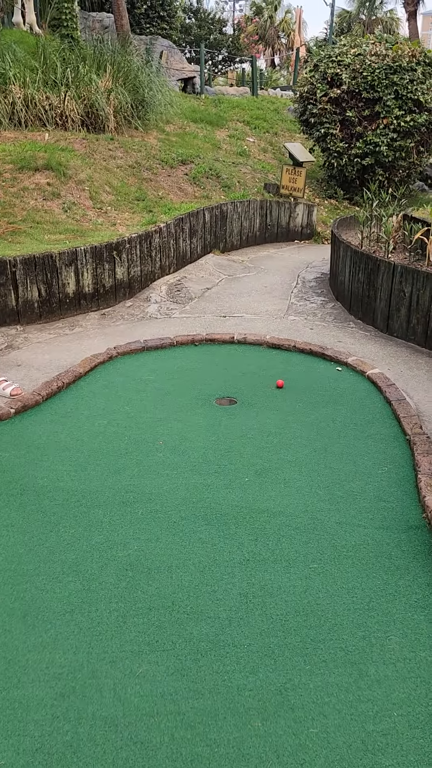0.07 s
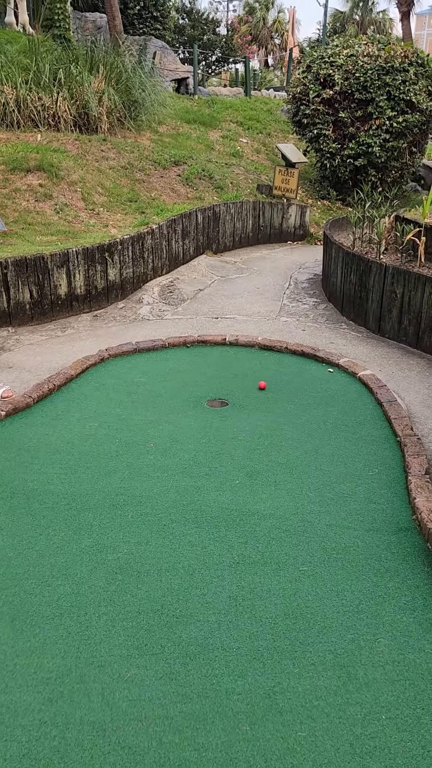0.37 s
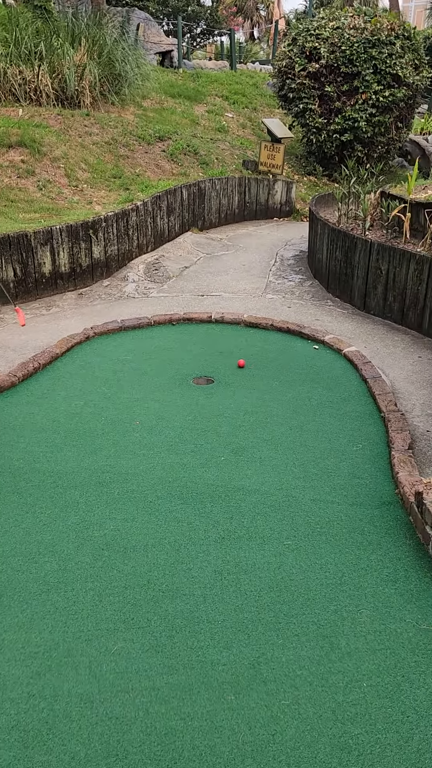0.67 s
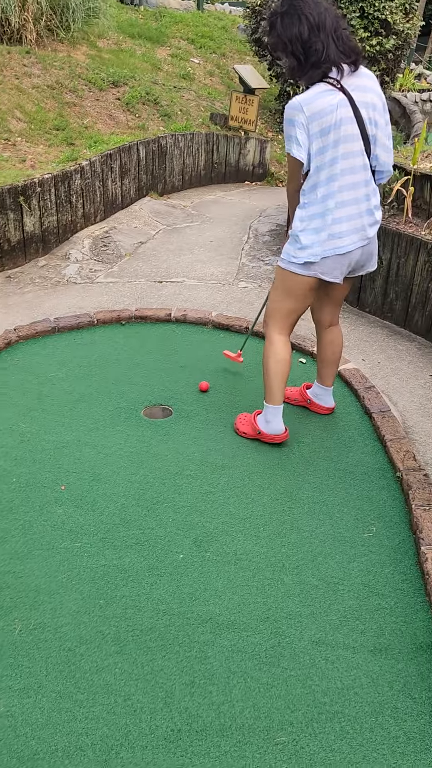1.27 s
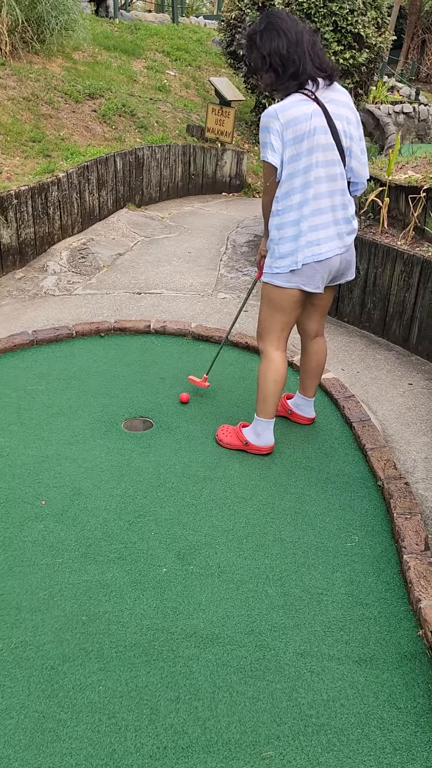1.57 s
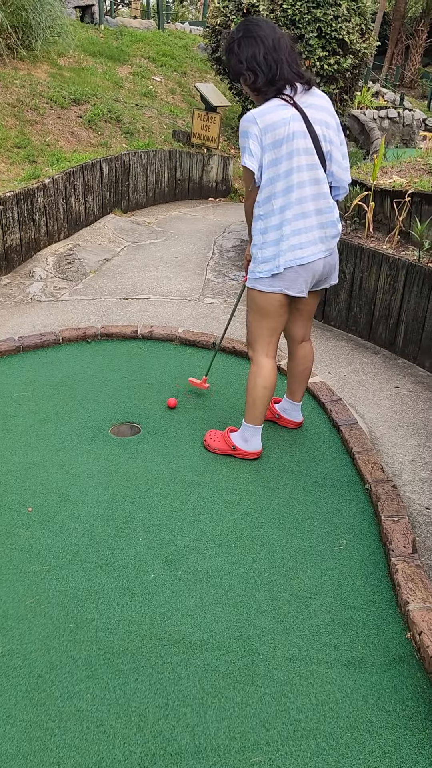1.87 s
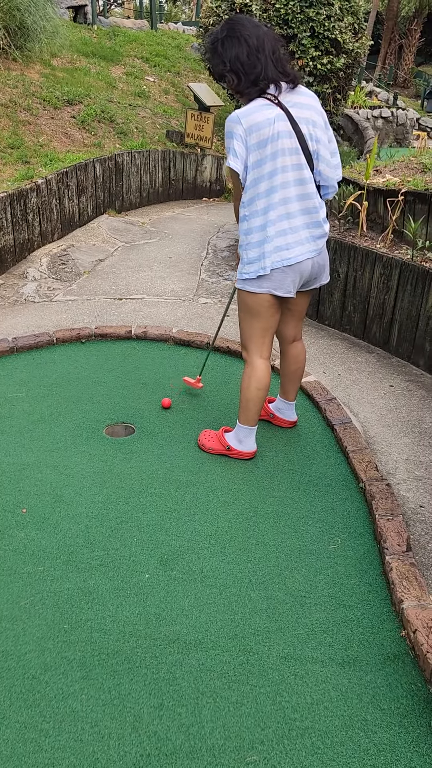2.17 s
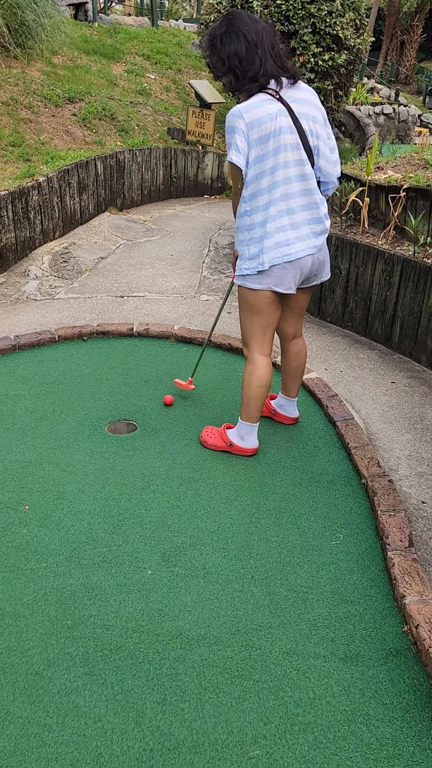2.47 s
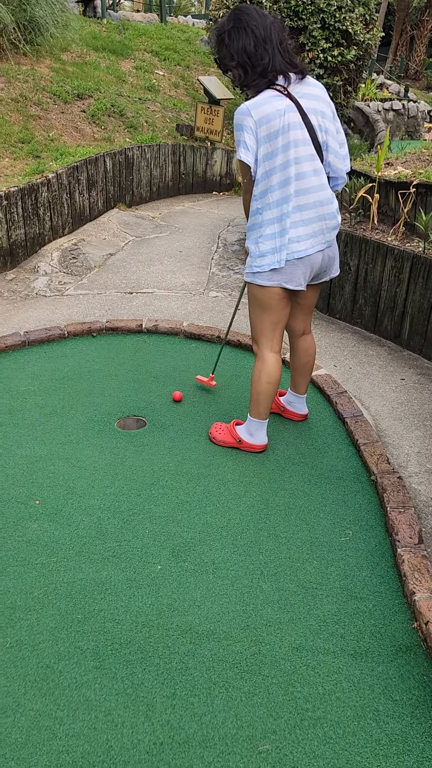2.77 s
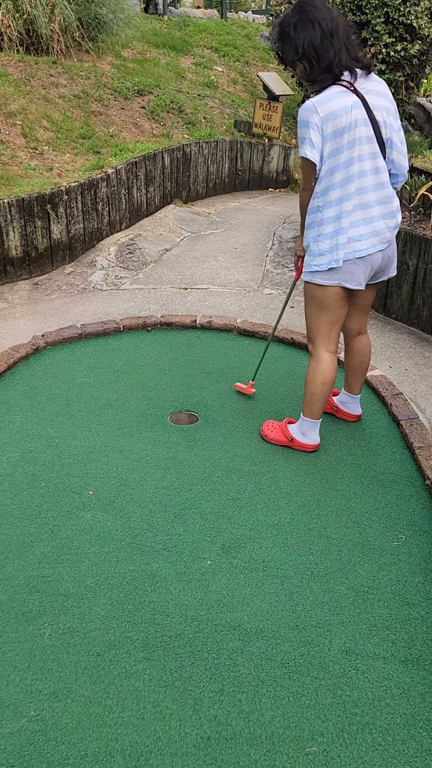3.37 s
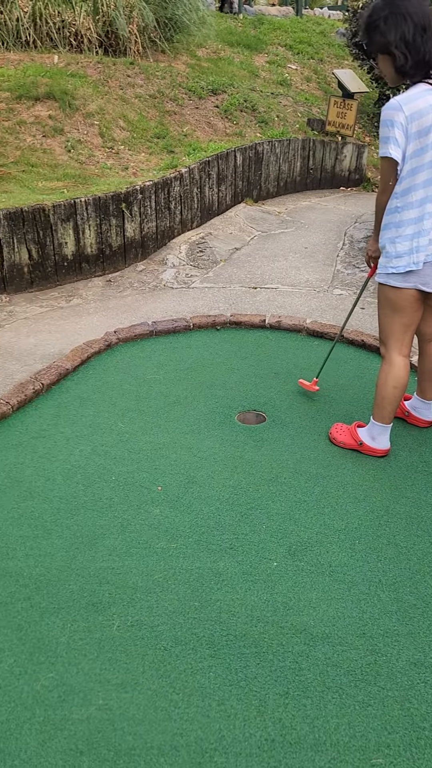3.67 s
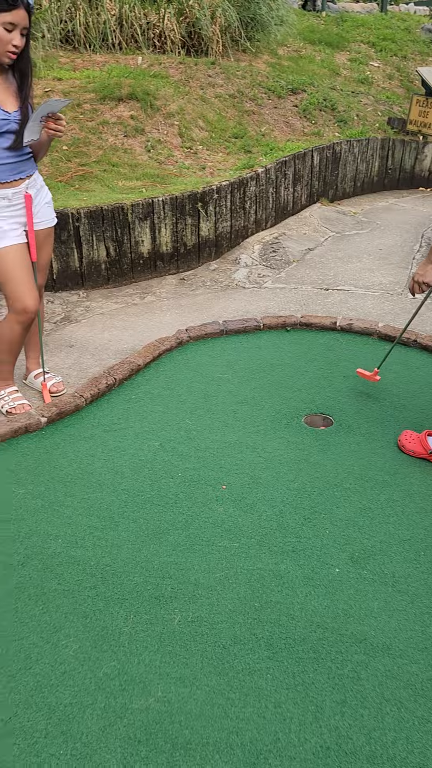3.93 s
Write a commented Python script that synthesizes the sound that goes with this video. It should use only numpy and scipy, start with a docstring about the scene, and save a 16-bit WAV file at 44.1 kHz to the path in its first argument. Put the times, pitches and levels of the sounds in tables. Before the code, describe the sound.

A golf ball drops into a metal cup, knocking and rattling over steady outdoor noise.

```python
"""A golf ball drops into the metal cup of a miniature golf hole and bounces on its bottom.
Each landing gives a hollow knock and a crack. In between, the ball touches the loose metal liner,
which clatters and rings until it settles back. A faint echo follows these sounds.
Behind them is a steady outdoor rush, and wind rumbles on the microphone."""
import sys
import numpy as np
from scipy import signal
from scipy.fft import rfft, irfft
from scipy.io import wavfile
from scipy.ndimage import uniform_filter1d

SR = 44100
rng = np.random.default_rng(int(sys.argv[2]) if len(sys.argv) > 2 else 0)


def transcribe(u):
    """Save the signal u as a 16-bit wav file named by the first command-line argument.

    u: samples, shape (n,) or (channels, n), limited to [-1, 1]; the rate is SR.
    q: integer samples, one column per channel.
    """
    v = np.clip(np.atleast_2d(u).T, -1, 1)
    q = np.round(v * 32767).astype(np.int16)
    wavfile.write(sys.argv[1], SR, q)


N = 176400

# the ball touches the wall: t/s, ring level/dB, clatter level/dB, pitch it rings most/Hz, rise/s
TOUCHES = [(3.3798, -11, -12, 7500, 0.00035), (3.3996, -21, -13.5, 6500, 0.0018),
           (3.403, -10.5, -18.5, 8750, 0.00244), (3.4062, -37, -21.5, 8000, 0.0012),
           (3.4225, -21, -29, 7050, .001), (3.4347, -24.5, -21.5, 8500, 0.00062),
           (3.444, -39, -28.5, 7000, .001), (3.5015, -22.5, -38, 4100, 0.00069),
           (3.513, -27, -23.5, 8000, 0.0045), (3.5204, -22.5, -16.5, 5200, 0.0025),
           (3.5333, -20, -18.5, 4900, 0.00075), (3.5358, -26, -22, 12500, 0.00078),
           (3.545, -19, -21, 4140, 0.0058), (3.5620, -49, -41, 5000, 0.0024),
           (3.57, -32.5, -27, 4940, .002), (3.5815, -40, -21, 7000, 0.0024),
           (3.595, -48, -36, 7000, 0.0012), (3.7430, -27.5, -27, 6400, 0.0009),
           (3.7494, -24.5, -42, 4500, 0.0008), (3.7541, -37, -26, 5000, 0.00056),
           (3.7605, -21.5, -39, 13000, 0.0017)]
# where cracks and clatter sit between the ears: f/Hz, left minus right/dB
CUP_BALANCE = [(500, -5), (2000, -3), (4800, -3.5), (6500, 2), (10300, 2), (11500, -20), (13000, -8),
               (14500, -9)]


def knocks():
    """Each landing is a sharp push and a crack on the bottom; it rings the hollow of the cup."""
    # the ball lands: t/s, knock level/dB, crack level/dB
    landings = [(3.3791, -10, -10.5), (3.5006, -19, -27), (3.5790, -32, -57), (3.7320, -25.5, -50)]
    # tones of the cup's air and bottom: f/Hz, level/dB, time to fade by 60 dB/s
    cup_tones = [(526, -14.5, 0.18), (715, 0, 0.027), (784, -7, 0.058), (840, -7.5, 0.033),
                 (1035, -12.5, 0.027), (1833, -15, 0.058), (2124, -20, 0.091)]
    # tone colour of the crack: f/Hz, level/dB
    crack_spectrum = [(100, -3), (350, -18), (800, -1), (1500, -15), (3000, 13), (7000, -1), (10000, -3),
                      (14000, -2), (16000, -5)]
    rise_s, push_width_s = 0.0003, 0.0001
    t = np.arange(SR // 4) / SR
    tones = sum(amp(db) * fade(t, t60) * np.sin(2 * np.pi * hz * t) for hz, db, t60 in cup_tones)
    push = amp(-22) * np.exp(-((t - rise_s) / push_width_s) ** 2)  # one short pressure pulse
    knock = (tones * (1 - np.exp(-t / rise_s)) + push) * pan(db=3.5)
    hollow, cracks = np.zeros((2, 2, N))
    for s, knock_db, crack_db in landings:
        add(hollow, s, amp(knock_db) * knock)
        grit = unit(rng.standard_normal(len(t)) + 0.46 * rng.standard_normal((2, len(t))))
        add(cracks, s, amp(crack_db) * fade(t, t60=0.0053) * grit)
    return hollow + colour(cracks, crack_spectrum, CUP_BALANCE)


def ring():
    """Each touch feeds the liner's ringing tones; settling back chokes them, the high ones first."""
    # tones of the metal liner: f/Hz, level/dB, time to fade by 60 dB/s, left minus right/dB
    liner_tones = [(3129, -5, .165, -4), (3222, -13, .08, -4), (3715, -23, .08, -3), (5508, -8, .12, -9),
                   (5557, -9, .11, -6), (5590, -16, .08, -6), (6160, -20, .08, -1), (7768, -5, .04, -1),
                   (7830, -3, .085, 2), (8275, -19, .1, 0), (8565, -15, .07, 0), (8596, -8, .11, 1),
                   (11632, -17, .1, -12), (12034, -1.5, .1, -12), (12090, -10, .08, -10),
                   (12995, -10, .08, 0), (13280, -12, .05, -8)]
    # the liner settles back: t/s
    settle_times = [3.448, 3.592, 3.764]
    focus_db, detune = 4, 0.0015  # drop an octave from a touch's pitch; random share of mistuning
    t, out = np.arange(SR // 3) / SR, np.zeros((2, N))
    for hz, db, t60, pan_db in liner_tones:
        energy, motion = np.zeros((1, N)), np.zeros((1, N), complex)
        for s, ring_db, _, focus_hz, rise in TOUCHES:
            offset, phase = rng.uniform(-0.95, 1, 2)
            settle_s = min(end for end in settle_times if end > s)
            since_settling = np.maximum(s + t - settle_s, 0)
            choke = fade(since_settling, t60=0.05 * (7500 / hz) ** 2)
            strength = amp(ring_db + db - focus_db * np.log2(hz / focus_hz) ** 2)
            level = strength * np.minimum(t / rise, 1) * fade(t, t60) * choke
            cycles = hz * (1 + detune * offset) * t + phase
            add(energy, s, level[None] ** 2)
            add(motion, s, level[None] * np.exp(2j * np.pi * cycles))
        # the summed energy sets the loudness; the summed motion only times the wave
        out += np.sqrt(energy) * motion.real / (abs(motion) + 1e-12) * pan(pan_db)
    return out


def clatter():
    """Each touch is a dying burst of tiny contacts that shake the liner's many short-lived tones."""
    # those tones taken together: f/Hz, level/dB
    clatter_spectrum = [(200, -10), (800, -3.5), (1500, -4), (2100, -2.5), (2500, -4.5), (3000, -1.5),
                        (3450, -4), (4200, -3), (5000, 0), (6500, 1.5), (7200, 2), (7750, -2), (8600, -2),
                        (9150, -19), (9600, 0), (9950, -26), (10400, 7), (10900, -17), (12000, -1),
                        (12500, -9), (13300, 9), (14300, -9), (16000, -36)]
    grain_db, grain_samples = 4.5, SR // 2000
    t, out = np.arange(SR // 5) / SR, np.zeros((2, N))
    for s, _, db, _, rise in TOUCHES:
        grains = amp(grain_db * np.repeat(rng.standard_normal(len(t)), grain_samples)[:len(t)])
        contacts = unit(grains * (rng.standard_normal(len(t)) + rng.standard_normal((2, len(t)))))
        add(out, s, amp(db) * np.minimum(t / rise, 1) * fade(t, t60=0.037) * contacts)
    return colour(out, clatter_spectrum, CUP_BALANCE)


def echo(x):
    """The kerb and the timber walls faintly scatter the sound back."""
    t = np.arange(SR // 2) / SR
    tail = rng.standard_normal((2, len(t))) * fade(t, t60=0.18) * np.minimum(t / 0.0094, 1)
    return amp(-11) * signal.oaconvolve(x, tail / np.linalg.norm(tail[0]), axes=1)[:, :N]


def wind():
    """The breeze buffets the microphone with a low rumble; left and right differ in the small swirls."""
    # strength of the wind: t/s, level/dB
    gusts = [(0.0, -48), (0.07, -35), (0.27, -33.5), (0.36, -43), (0.91, -36.5), (0.99, -44.5), (1.12, -29),
             (1.18, -42), (1.22, -28.5), (1.29, -38), (1.31, -25.5), (1.4, -34.5), (1.61, -36.5),
             (1.63, -29.5), (1.71, -44), (1.84, -24), (1.95, -34.5), (2.13, -31), (2.23, -28), (2.34, -9.5),
             (2.38, -12), (2.41, -23), (2.61, -45), (2.86, -31), (3.09, -38.5), (3.11, -29.5), (3.23, -51),
             (3.26, -36), (3.45, -39), (3.49, -22), (3.55, -47.5), (3.69, -23.5), (3.71, -29), (3.8, -35),
             (3.82, -28), (4.0, -48)]
    # centre pitch of the rumble: t/s, f/Hz
    pitch_curve = [(0, 56.08), (.9, 60.75), (1.15, 82.76), (1.4, 94.37), (1.85, 65.94), (2.08, 97.34),
                   (2.33, 66.98), (2.8, 70.4), (3.5, 57.36), (3.85, 68.26), (4, 64.96)]
    # tone colour of the rumble: multiple of the centre pitch, level/dB
    rumble_spectrum = [(.12, -34), (.35, -16), (.65, -3.5), (1, 4), (1.35, -4), (1.9, -18.5), (3, -33),
                       (6, -50.5), (14, -75), (60, -100)]
    t = np.arange(N) / SR
    centre_hz = np.interp(t, *np.transpose(pitch_curve))
    multiple = (np.fft.rfftfreq(N, 1 / SR) + 1) / centre_hz.mean()
    shape = amp(read(rumble_spectrum, multiple))
    shapes = np.array([shape, shape * np.minimum(multiple, 3) ** 1.8])  # shared part, brighter side part
    swirls = signal.hilbert(irfft(rfft(rng.standard_normal((2, N))) * shapes, N))
    strength = np.sqrt(uniform_filter1d(abs(swirls) ** 2, size=1500, axis=1))
    swirls = swirls.real / strength ** 0.48  # partly evens out the loudness
    position = np.cumsum(centre_hz) / centre_hz.mean()  # reading faster raises the pitch
    shared, side = (unit(np.interp(position, np.arange(N), swirl)) for swirl in swirls)
    return amp(np.interp(t, *np.transpose(gusts))) * (shared + amp(-18.5) * np.array([side, -side]))


def puff():
    """A last short bump of air hits the microphone, higher in pitch than the rumble."""
    peak_s, width_s, pitch_hz = 3.822, 0.016, 143
    band = signal.butter(2, [pitch_hz / 2, pitch_hz * 1.2], "band", fs=SR, output="sos")
    air = signal.sosfilt(band, rng.standard_normal((2, N)))
    bump = np.exp(-((np.arange(N) / SR - peak_s) / width_s) ** 2 / 2)
    return amp(-29) * unit(air + air[::-1] / 2) * bump


def rush(size=1024):
    """Steady distant noise with soft patches; it reaches the left side of the microphone first."""
    # tone colour of the rush: f/Hz, level/dB
    rush_spectrum = [(30, -29), (80, 11), (130, 1), (180, -3.5), (260, -6), (400, -8), (570, -4.5),
                     (780, -3.5), (930, -5.5), (1400, -7), (1850, -10.5), (2900, -11.5), (4700, -12),
                     (6500, -16), (7500, -15.5), (8200, -22.5), (8900, -29), (10200, -27), (12000, -20.5),
                     (14000, -29.5), (16000, -36)]
    # how alike the two sides are: f/Hz, likeness from 0 to 1
    likeness = [(100, 0.79), (300, 0.63), (700, 0.78), (1200, 0.12), (2200, 0.2), (4500, 0.23),
                (8000, 0.22), (15000, 0.2)]
    # where the rush sits between the ears: f/Hz, left minus right/dB
    balance = [(60, -5), (110, 3.5), (200, -2), (380, 1.5), (700, 1.0), (1290, 0.0), (2380, 0), (4400, -3),
               (8120, 0.5), (15000, -4.0)]
    # the middle pitches rise and fall a little: t/s, level/dB
    middle_curve = [(0, -2.5), (0.299, 1.5), (.42, -1.5), (1.2, 0), (1.8, 0), (2.35, 0), (2.6, -1),
                    (2.96, 0.5), (3.05, 2), (3.13, -.5), (4, 1)]
    lead_s, patch_db, swell_db, middle_hz = 0.00013, 1.1, -0.06, 720
    hop = size // 4
    frames, hz = N // hop + 5, np.fft.rfftfreq(size, 1 / SR)
    a, b, c, d, patches, swell = rng.standard_normal((6, frames, len(hz)))
    patches = unit(uniform_filter1d(uniform_filter1d(patches, size=14, axis=0), size=10, axis=1))
    swell = unit(uniform_filter1d(swell[:, :1], size=50, axis=0))
    right, left_only = a + 1j * b, c + 1j * d
    same = read(likeness, hz)
    left = (same * right + np.sqrt(1 - same ** 2) * left_only) * np.exp(2j * np.pi * hz * lead_s)
    middle_db = np.interp(np.arange(frames) * hop / SR, *np.transpose(middle_curve))[:, None]
    middle_band = np.exp(-np.log2((hz + 1) / middle_hz) ** 2)
    gain = amp(read(rush_spectrum, hz) + patch_db * patches + swell_db * swell + middle_db * middle_band)
    spectra = np.array([left, right]) * gain * pan(read(balance, hz))[:, None]
    _, noise = signal.istft(spectra, nperseg=size, noverlap=size - hop, time_axis=-2, freq_axis=-1)
    return amp(-36) * unit(noise[:, :N])


def amp(db):
    """Turns decibels into a multiplier."""
    return 10 ** (np.asarray(db) / 20)


def unit(x):
    """Scales a signal to an average power of 1."""
    return x / np.sqrt(np.mean(abs(x) ** 2) + 1e-20)


def read(points, hz):
    """Reads between the rows of a table, with octaves evenly spaced."""
    f, value = np.transpose(points)
    return np.interp(np.log(hz + 1e-6), np.log(f + 1e-6), value)


def pan(db):
    """Left and right multipliers for a level difference."""
    gains = np.array([amp(np.atleast_1d(db) / 2), amp(-np.atleast_1d(db) / 2)])
    return gains / np.sqrt((gains ** 2).mean(0))


def fade(t, t60):
    """Dies away by 60 dB every t60 seconds."""
    return np.exp(-np.log(1000) * t / t60)


def add(mix, s, sound):
    """Mixes a sound in at s seconds."""
    part = mix[:, round(s * SR):][:, :sound.shape[1]]
    part += sound[:, :part.shape[1]]


def colour(x, spectrum, balance, size=2048):
    """Gives a sound a tone colour and a left-right balance; white noise keeps its overall power."""
    hz = abs(np.fft.fftfreq(size, 1 / SR))
    log_gain = np.log(unit(amp(read(spectrum, hz))) * pan(read(balance, hz)))
    taps = np.fft.ifft(np.exp(np.conj(signal.hilbert(log_gain)))).real  # nothing sounds before the hit
    return signal.oaconvolve(x, taps[:, :size // 2], axes=1)[:, :N]


def scene():
    """The ball in the cup, over the outdoor background."""
    cup = knocks() + ring() + clatter()
    return cup + echo(cup) + rush() + wind() + puff()


def record(dry):
    """Clips peaks at full scale, then cuts the highest treble."""
    cutoff_hz = 16200
    lowpass = signal.firwin(511, cutoff_hz, window=("kaiser", 9), fs=SR)
    return signal.oaconvolve(np.clip(dry, -1, 1), lowpass[None], "same")


dry = scene()
out = record(dry)
transcribe(out)
```